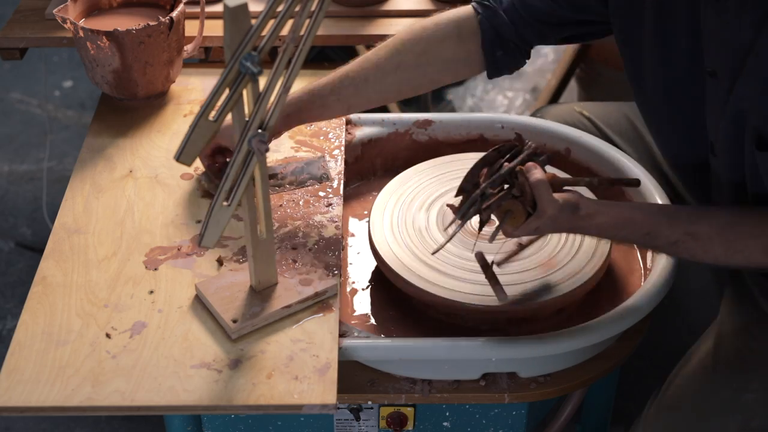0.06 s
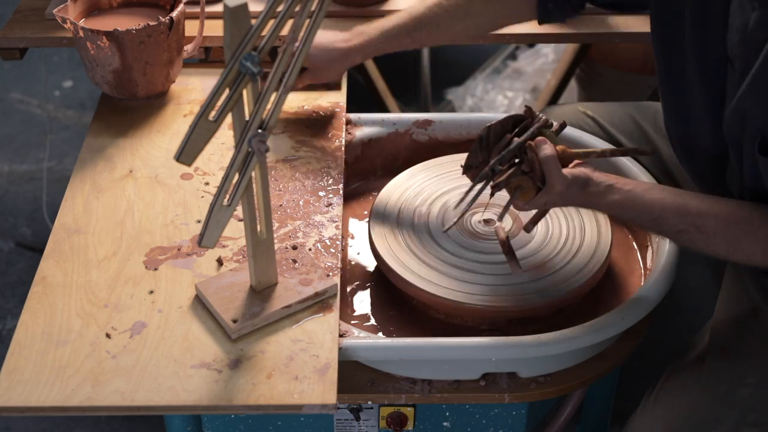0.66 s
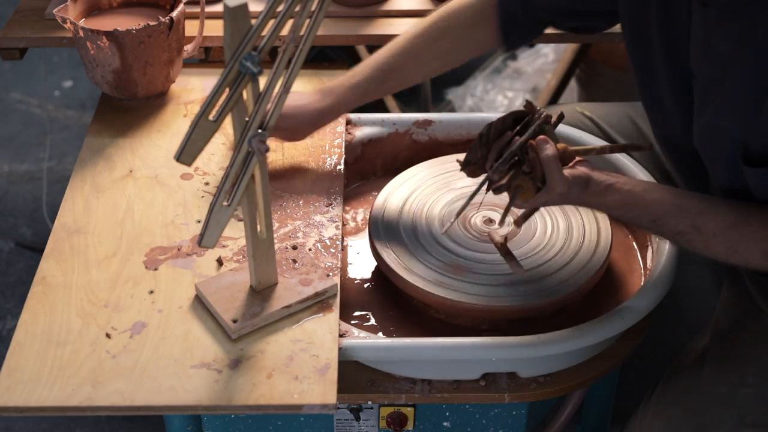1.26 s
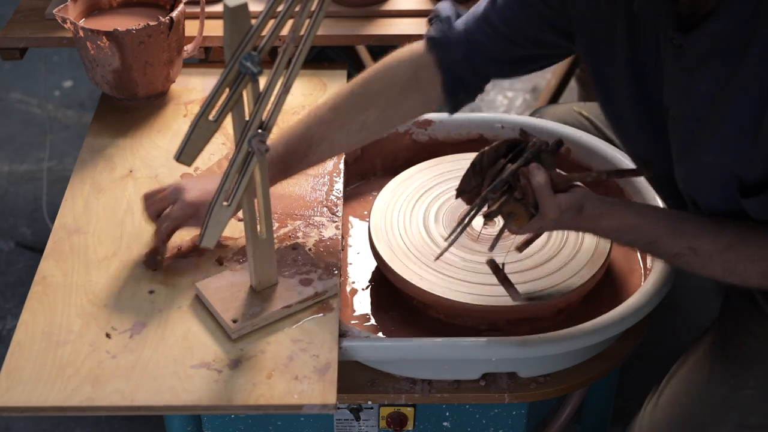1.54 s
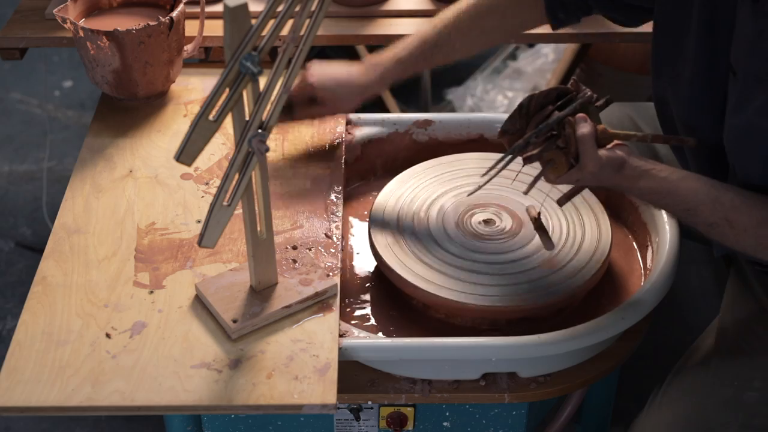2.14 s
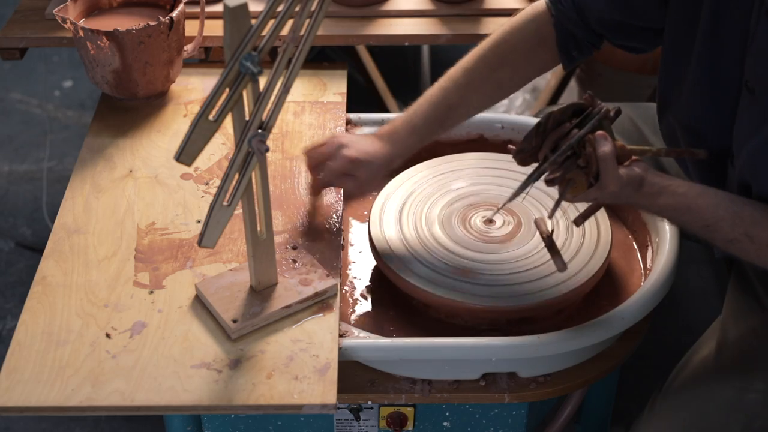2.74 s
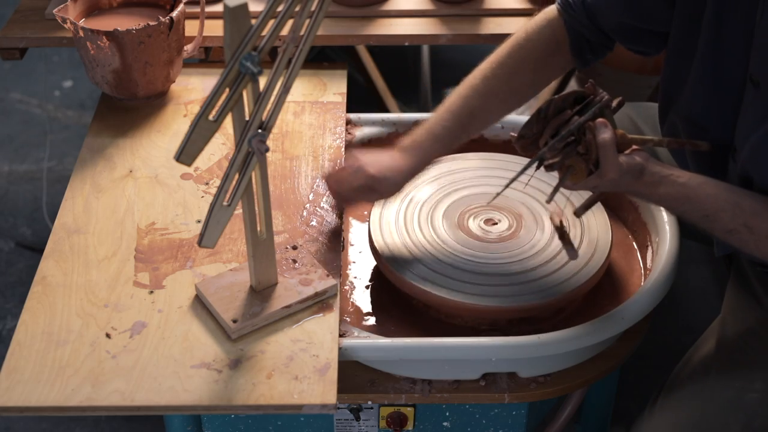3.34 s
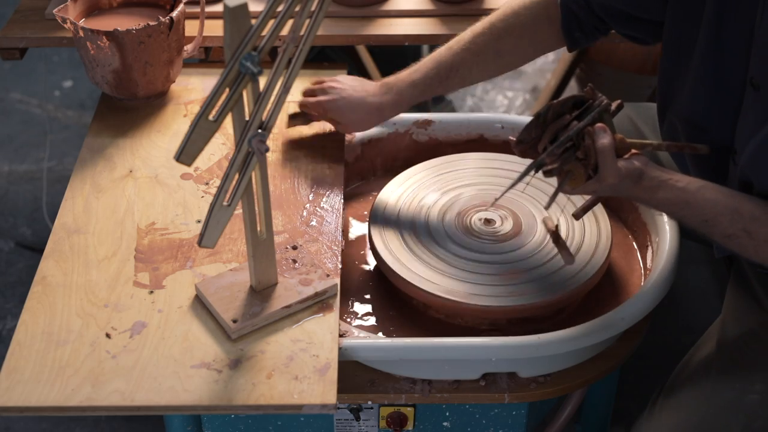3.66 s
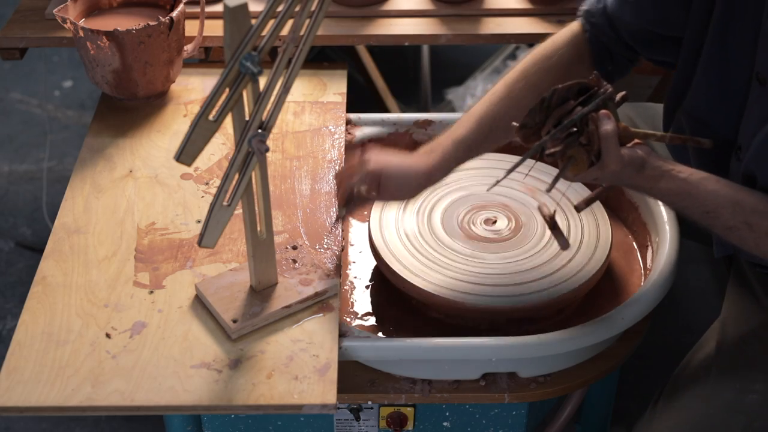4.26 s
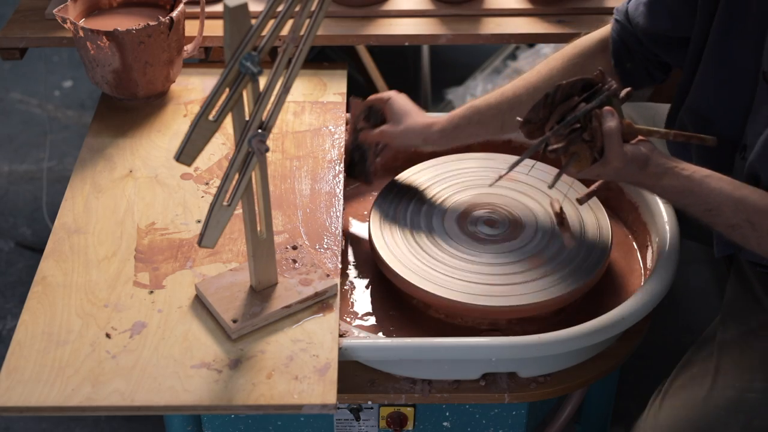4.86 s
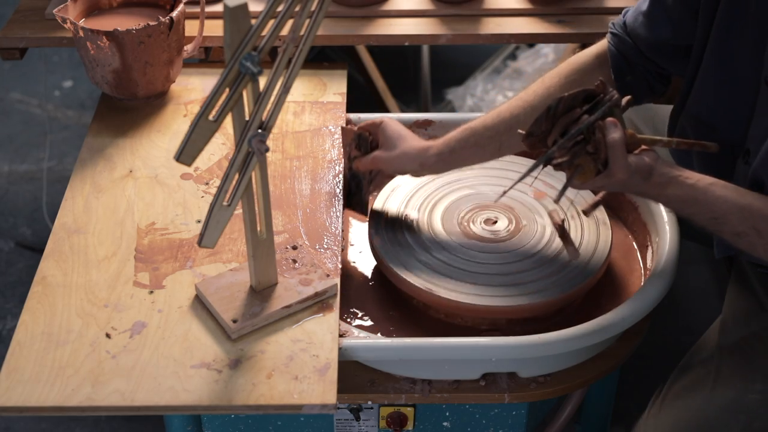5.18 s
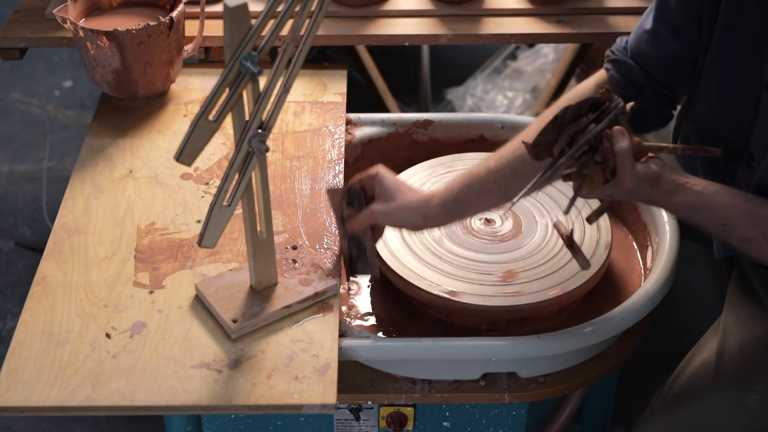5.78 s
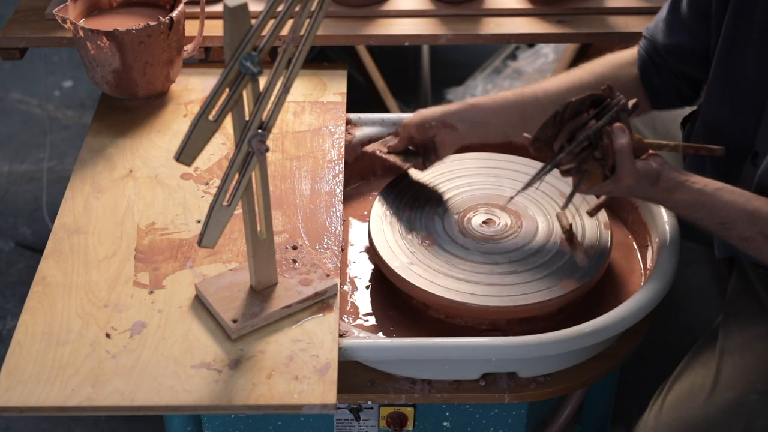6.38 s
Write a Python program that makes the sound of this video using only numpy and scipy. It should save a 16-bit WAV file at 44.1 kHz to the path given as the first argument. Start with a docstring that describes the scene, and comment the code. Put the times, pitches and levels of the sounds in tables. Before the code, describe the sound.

Over the soft rumble of a potter's wheel, faint squelches lead into short, dry-ending rubs of a wet sponge on a wooden board, dotted with sharp wet pops. Louder, hollower wipes and a slow sweep follow at the edge, with more ring to them. Then the sponge is squeezed along the wheel's splash pan in one softer, continuous rub, with light knocks and small bubbles popping.

```python
"""Wet slaps, rubbing and fizz: a sponge wipes clay slip off a wooden board by a potter's wheel.
Trapped air pops as the sponge lands or catches; stick-slip makes the rub, wet pores the fizz.
Early strokes die away quickly; from about 2.7 s on, sounds ring longer. Last, the sponge is
squeezed along the inside of the splash pan and bubbles burst. The wheel rumbles softly throughout."""
import sys
import numpy as np
from scipy import signal
from scipy.fft import rfft, irfft, next_fast_len
from scipy.io import wavfile
from scipy.ndimage import uniform_filter1d, map_coordinates

SR = 44100
rng = np.random.default_rng(int(sys.argv[2]) if len(sys.argv) > 2 else 0)


def put_to_file(sound):
    """Save the sound as 16-bit audio at rate SR, in the file named by the first command-line argument."""
    columns = np.atleast_2d(sound).T  # one column per channel
    safe = np.clip(columns, -1, 1)
    whole_steps = np.round(safe * 32767)
    wavfile.write(sys.argv[1], SR, whole_steps.astype(np.int16))


N = 283122

# Spectra of board rub, pore fizz and low drag. Each row: frequency in Hz, level in dB.
BOARD_RUB_SPECTRUM = [(100, -63), (500, -43), (800, -12), (1000, 1.5), (1400, -1.5), (1750, 0),
                      (2300, -1.5), (2900, -6.5), (3300, -12.5), (4200, -17.5), (5200, -25.5), (8000, -46)]
FIZZ_SPECTRUM = [(2000, -13.5), (4000, 4), (5500, -4.5), (6600, 2.5), (8400, -2), (10000, -2),
                 (12000, -9.5), (14000, -18.5), (15800, -45)]
DRAG_SPECTRUM = [(30, -61), (70, -23.5), (130, -17), (240, -7), (310, -9.5), (400, -2), (650, -1.5),
                 (800, -5.5), (1200, -20.5), (3000, -66)]
# Splash pan resonances. Each row: frequency in Hz, width in Hz, boost in dB.
PAN_RESONANCES = [(375, 19, 3.7), (473, 14, 2.5), (678, 9.3, 2.6), (986, 27, 3.8), (1200, 7.9, 3.6),
                  (1517, 18, 1.7), (1781, 37, 8), (2170, 14, 3.2), (2230, 24, 7.3), (2540, 14, 2),
                  (4460, 170, 2.6), (6600, 200, 1.7), (10300, 1500, 2.7)]


def board_wipes():
    """The sponge rubs the flat board and excites its resonances."""
    # Each row: start in s, length in s, rub, fizz and drag in dB, end push of rub and fizz in dB.
    strokes = [(0.582, 0.073, -57.5, -77, -67.5, 0.5, 3), (0.755, 0.1, -46, -59.5, -62, 10, 11.5),
               (1.05, 0.21, -42.5, -53.5, -57.5, 5, 2.5), (1.352, 0.12, -43.5, -49, -57.5, 7, -0.5),
               (1.586, 0.061, -59, -82, -66, -3.5, 0), (1.734, 0.3917, -49.5, -61.5, -59, 8, 1.5),
               (2.266, 0.28, -48, -59.5, -55.5, 2, 5)]
    # Board resonances. Each row: frequency in Hz, width in Hz, boost in dB.
    modes = [(365, 9.3, 10), (503, 23, 5.5), (1240, 110, 1.5), (1820, 110, 2.5), (2230, 100, 1.5)]
    gains = stroke_gains(strokes, rub_attack_s=0.016, fizz_attack_s=0.011, drag_attack_s=0.02,
                         release_db_per_s=500, drag_push=1.0)
    return wipe(gains, BOARD_RUB_SPECTRUM, FIZZ_SPECTRUM, modes, slips_per_s=5000, slip_spread_db=2.0,
                pores_per_s=13000, pore_spread_db=4.5, clump_db=-0.1)


def edge_wipes():
    """Short, hollow-sounding strokes over the board's edge."""
    # Each row: start in s, length in s, rub, fizz and drag in dB, end push of rub and fizz in dB.
    strokes = [(2.667, 0.011, -57.5, -75, -61.5, -0.5, 3), (2.706, 0.023, -48, -53, -58, 3.5, -0.5),
               (2.893, 0.11, -37.5, -45, -48, 6.5, -2.5), (3.201, 0.086, -39.5, -47, -46, 6.5, -3.5)]
    # Each row: frequency in Hz, level in dB.
    rub_spectrum = [(100, -64), (600, -11.5), (830, -9), (1080, 1.5), (1450, -4), (1900, -4), (2650, -3),
                    (3200, -14), (4300, -21), (8000, -40.5)]
    gains = stroke_gains(strokes, rub_attack_s=0.0094, fizz_attack_s=0.017, drag_attack_s=0.0027,
                         release_db_per_s=412)
    return wipe(gains, rub_spectrum, FIZZ_SPECTRUM, PAN_RESONANCES, slips_per_s=6000,
                slip_spread_db=3.0, pores_per_s=16000, pore_spread_db=4.5, clump_db=1.0)


def edge_sweep():
    """One slow, hollow-sounding sweep along the edge."""
    # One row: start in s, length in s, rub, fizz and drag in dB, end push of rub and fizz in dB.
    stroke = [(3.803, 0.37, -35, -45, -50.5, -2.6, -1.8)]
    # Each row: frequency in Hz, level in dB.
    rub_spectrum = [(200, -63), (830, -20.5), (1000, 0), (1500, -3), (2300, 0), (2750, -6.5), (3200, -9),
                    (4300, -23.5), (5300, -31), (8000, -38)]
    gains = stroke_gains(stroke, rub_attack_s=0.077, fizz_attack_s=0.084, drag_attack_s=0.14,
                         release_db_per_s=173)
    return wipe(gains, rub_spectrum, FIZZ_SPECTRUM, PAN_RESONANCES, slips_per_s=6000,
                slip_spread_db=4.0, pores_per_s=16000, pore_spread_db=0.0, clump_db=-1.1)


def pan_wipe():
    """The sponge slides inside the pan in one unbroken contact."""
    # Each row: time in s, rub in dB, fizz in dB.
    levels = [(4.96, -56.5, -68.5), (5.006, -53, -61), (5.012, -49.5, -56), (5.05, -55.5, -62),
              (5.232, -49, -61), (5.352, -60, -68.5), (5.646, -56, -65.5), (5.67, -51, -59.5),
              (5.77, -55.5, -67), (5.78, -53, -59), (5.904, -56, -62), (5.97, -51, -68)]
    # Each row of both: frequency in Hz, level in dB.
    rub_spectrum = [(200, -60), (620, -11), (830, -9.5), (1000, 2), (1450, -4.5), (2000, -6.5),
                    (2300, -3.5), (2900, -6.5), (3500, -15), (4500, -22), (5200, -31), (8000, -41)]
    fizz_spectrum = [(2000, -20), (4000, 1.5), (5400, -5.5), (6500, 1), (8000, 1), (10300, 2), (12000, -4),
                     (14000, -16), (15800, -25)]
    t = np.arange(N) / SR
    times_s, rub_db, fizz_db = np.transpose(levels)
    held = touch(start_s=4.943, length_s=0.97, attack_s=0.0026, release_db_per_s=300)
    rub = held * amp(np.interp(t, times_s, rub_db))
    fizz = held * amp(np.interp(t, times_s, fizz_db))
    gains = amp(-1.6) * rub, amp(-1.5) * fizz, amp(-9) * rub  # drag follows rub
    return wipe(gains, rub_spectrum, fizz_spectrum, PAN_RESONANCES, slips_per_s=2500,
                slip_spread_db=4.0, pores_per_s=1400, pore_spread_db=0.5, clump_db=1.5)


def wipe(gains, rub_spectrum, fizz_spectrum, modes, slips_per_s, slip_spread_db,
         pores_per_s, pore_spread_db, clump_db):
    """Stick-slip shakes the surface while wet pores crackle in clumps."""
    judder = amp(0.71 * wobble(110))  # grip catches and lets go
    rub_slips = grains(slips_per_s, slip_spread_db) * judder
    rub = travel(colour(rub_slips, rub_spectrum, modes), depth_db=2)
    drag_slips = grains(slips_per_s, slip_spread_db) * judder
    drag = travel(colour(drag_slips, DRAG_SPECTRUM, modes), depth_db=3.5)
    crackle = grains(pores_per_s, pore_spread_db) * judder * amp(clump_db * wobble(70))
    fizz = travel(colour(crackle, fizz_spectrum, modes), depth_db=1.35)
    rub_gain, fizz_gain, drag_gain = gains
    return amp(0.16) * (rub_gain * rub + fizz_gain * fizz + drag_gain * drag)


def stroke_gains(strokes, rub_attack_s, fizz_attack_s, drag_attack_s, release_db_per_s, drag_push=0):
    """Rub, fizz and drag gains: each stroke grips, slides, then pushes or eases as the hand turns."""
    turn_s, lag_s = 0.035, 0.0058  # pores fizz only once compressed
    t = np.arange(N) / SR
    rub, fizz, drag = np.zeros((3, N))
    for start_s, length_s, rub_db, fizz_db, drag_db, push_db, fizz_push_db in strokes:
        turn = np.exp(-(np.minimum(t - start_s - length_s, 0) / turn_s) ** 2)
        rub_touch = touch(start_s, length_s, rub_attack_s, release_db_per_s)
        fizz_touch = touch(start_s + lag_s, length_s - lag_s, fizz_attack_s, 1.23 * release_db_per_s)
        drag_touch = touch(start_s, length_s, drag_attack_s, release_db_per_s)
        rub += amp(rub_db + push_db * turn) * rub_touch
        fizz += amp(fizz_db + fizz_push_db * turn) * fizz_touch
        drag += amp(drag_db + drag_push * push_db * turn) * drag_touch
    return rub, fizz, drag


def touch(start_s, length_s, attack_s, release_db_per_s):
    """Gain of one soft contact: grip, hold, release."""
    t = np.arange(N) / SR - start_s
    grip = (1 - np.exp(-np.maximum(t / attack_s + 0.5, 0))) ** 2
    return grip * amp(-release_db_per_s * np.maximum(t - length_s, 0))


def slaps():
    """Wet slaps as the sponge lands or catches: trapped air pops, the slip splatters."""
    # Each row: time in s, level in dB, pitch in Hz, splatter in dB re level, splatter rise in s.
    hits = [(0.7429, -28.5, 1690, -10, 0.03), (0.7495, -33.5, 1490, -10, 0.033),
            (1.042, -22, 2560, -17.5, 0.041), (1.337, -37, 1600, -0.5, 0.026),
            (1.607, -39, 1710, -3.5, 0.052), (1.714, -29.5, 2420, -7.5, 0.022),
            (2.246, -43, 1490, -4, 0.007), (2.2617, -30.5, 1480, -11.5, 0.05),
            (2.8872, -28.5, 1990, -5.5, 0.0045), (2.9989, -21, 1310, -22, 0.03),
            (3.202, -31, 1930, -5, 0.016), (3.281, -23, 1290, -19, 0.03), (3.7664, -40.5, 2070, -3, 0.0091)]
    pop_peak_s, splatter_t60_s = 0.00043, 0.058
    pops, splatter = np.zeros((2, N))
    for at_s, db, hz, splatter_db, rise_s in hits:
        near = np.arange(round((at_s - 0.03) * SR), round((at_s + 0.12) * SR))
        t = near / SR - at_s
        swell = np.maximum(t, 0) / pop_peak_s
        flow = (swell * np.exp(1 - swell)) ** 3 * np.sin(2 * np.pi * hz * t)
        pops[near] += amp(db) * np.gradient(flow, t) / (2 * np.pi * hz)  # pressure ~ d(flow)/dt
        envelope_db = np.where(t < 0, -6 + 60 * t / rise_s, -60 * t / splatter_t60_s)
        splatter[near] += amp(db + splatter_db + envelope_db)
    drops = grains(6000, spread_db=1.0)
    spray = unit(colour(drops, BOARD_RUB_SPECTRUM))
    spray += amp(-26) * unit(colour(drops, FIZZ_SPECTRUM))
    spray += amp(-13) * unit(colour(drops, DRAG_SPECTRUM))
    return pops + splatter * spray


def squelches():
    """Water seeps through the squeezed sponge; single bubbles burst."""
    # Each row: start in s, length in s, level in dB.
    squeezes = [(0.074, 0.034, -70.5), (0.133, 0.026, -66.5), (0.297, 0.006, -60.5), (0.344, 0.043, -67.5),
                (0.415, 0.029, -64), (0.551, 0.067, -66), (1.036, 0.016, -60), (1.631, 0.012, -63.5),
                (4.476, 0.061, -56)]
    # Each row: time in s, level in dB.
    bubbles = [(0.095, -56), (0.435, -59), (0.655, -47.5), (0.7677, -53), (4.479, -46.5), (5.164, -41),
               (5.226, -40), (5.466, -45), (5.565, -46), (5.785, -44), (5.897, -40), (6.1512, -55.5)]
    # Each row: frequency in Hz, level in dB.
    wet_spectrum = [(400, 0.5), (1500, 2.5), (2500, 6), (3500, -2.5), (5200, -5.5), (6700, 0.5),
                    (8500, -5.5), (10500, -1), (13000, -20), (15800, -17)]
    burst_t60_s = 0.071
    t, bursts = np.arange(SR // 10) / SR, np.zeros(N + SR)
    for at_s, db in bubbles:
        bursts[round(at_s * SR):][:len(t)] += amp(db - 9.5 - 60 * t / burst_t60_s)
    pressed = sum(amp(db) * touch(start_s, length_s, attack_s=0.0065, release_db_per_s=604)
                  for start_s, length_s, db in squeezes)
    seep = travel(colour(grains(4500, spread_db=2.0), wet_spectrum), depth_db=2)
    burst_noise = travel(colour(rng.standard_normal(N), wet_spectrum), depth_db=3.5)
    return pressed * seep + bursts[:N] * burst_noise


def knocks_and_squeak():
    """Light knocks, ticks and a short high squeak, each a narrow cluster of tones."""
    # Each row: time in s, level in dB, pitch in Hz, T60 in s.
    events = [(0.107, -61, 2430, 0.11), (0.146, -56, 485, 0.079), (1.378, -37, 6400, 0.028),
              (2.075, -45.5, 140, 0.13), (3.603, -51.5, 585, 0.12), (4.993, -38, 603, 0.044),
              (5.0135, -37.5, 620, 0.061), (5.0145, -37.5, 1170, 0.028), (5.668, -45, 1260, 0.14),
              (6.371, -66.5, 3680, 0.082)]
    t, out = np.arange(SR // 4) / SR, np.zeros(N + SR)
    for at_s, db, hz, t60_s in events:
        cluster_hz = hz * np.exp(0.1156 * rng.standard_normal((12, 1)))
        cycles = cluster_hz * t + rng.random(cluster_hz.shape)
        tone = unit(np.sin(2 * np.pi * cycles).sum(axis=0))
        attack = 1 - np.exp(-t * hz / 2)
        out[round(at_s * SR):][:len(t)] += amp(db - 2 - 60 * t / t60_s) * attack * tone
    return out[:N]


def ring(x, decay):
    """Diffuse tail, drawn afresh every 0.2 s so that no fixed pitches stand out."""
    step, length = SR // 5, SR * 3 // 4
    out = np.zeros(N + SR)
    for start in range(0, N, step):
        piece = x[start:start + step]
        if piece.any():
            hz, t, noise = signal.stft(rng.standard_normal(length), SR, nperseg=256)
            fade = amp(-60 * t / along(decay, hz)[:, None])
            tail = signal.istft(noise * fade, SR, nperseg=256)[1]
            response = signal.fftconvolve(piece, tail / np.linalg.norm(tail))
            out[start:start + len(response)] += response
    return out[:N]


def wheel():
    """The drive rumbles under a faint hiss; the level steps up once, then eases off."""
    # Each row: frequency in Hz, level in dB.
    rumble_spectrum = [(25, -37), (50, -29.5), (80, -5.5), (250, -3.5), (320, -8), (460, -7.5), (620, -9.5),
                       (800, -11.5), (2000, -17), (3500, -26), (5500, -33.5), (11000, -30), (15800, -35.5)]
    # Drive resonances. Each row: frequency in Hz, width in Hz, boost in dB.
    modes = [(79.3, 13, 5), (145.8, 5.5, 9.3), (256, 13.6, 7.2), (482, 6.4, 10.4), (626, 6.1, 17.6)]
    start_db, swell_db, ease_db_per_s = -70, 6.5, 0.76
    swell_s = (2.7, 2.9)
    t = np.arange(N) / SR
    change_db = np.interp(t, swell_s, [0, swell_db]) - ease_db_per_s * np.maximum(t - swell_s[1], 0)
    gain = amp(start_db + change_db + 0.46 * wobble(4.9))
    return gain * unit(colour(rng.standard_normal(N), rumble_spectrum, modes))


def grains(per_s, spread_db):
    """Random impulses of log-normal size."""
    happens = rng.random(N) < per_s / SR
    sign = np.sign(rng.standard_normal(N))
    return happens * sign * amp(spread_db * np.clip(rng.standard_normal(N), -3, 2.5))


def travel(x, depth_db):
    """Bands swell and fade at random as the contact point moves; output rms 1."""
    bands = signal.stft(x, nperseg=1024)[2]
    drift = uniform_filter1d(rng.standard_normal(bands.shape), size=3, axis=0)
    drift = uniform_filter1d(drift, size=5, axis=1)
    return unit(signal.istft(bands * amp(depth_db * unit(drift)), nperseg=1024)[1][:N])


def colour(x, spectrum, modes=()):
    """Minimum-phase filter: smooth spectrum plus resonant peaks."""
    size = next_fast_len(N + SR // 4, True)
    hz = np.fft.rfftfreq(size, 1 / SR)
    peaks_db = sum(db / (1 + (2 * (hz - mode_hz) / width_hz) ** 2) for mode_hz, width_hz, db in modes)
    cepstrum = irfft(np.log(amp(along(spectrum, hz) + peaks_db)), size)
    cepstrum[1:size // 2] *= 2  # fold to causal
    cepstrum[size // 2 + 1:] = 0
    return irfft(rfft(x, size) * np.exp(rfft(cepstrum)), size)[:N]


def wobble(knots_per_s):
    """Smooth random curve."""
    knots = rng.standard_normal(int(N * knots_per_s / SR) + 4)
    return map_coordinates(knots, [np.arange(N) * knots_per_s / SR])


def along(points, hz):
    """Interpolate (Hz, value) points on a log frequency axis."""
    points_hz, values = np.transpose(points)
    return np.interp(np.log(hz + 1), np.log(points_hz + 1), values)


def amp(db):
    """Decibels to gain."""
    return 10 ** (np.asarray(db) / 20)


def unit(x):
    """Scale to rms 1."""
    return x / np.sqrt(np.mean(x ** 2) + 1e-20)


def scene():
    """Early strokes die away quickly; later sounds ring longer."""
    # Each row of both: frequency in Hz, T60 in s.
    short_decay = [(200, 0.21), (2000, 0.11), (10000, 0.049)]
    long_decay = [(200, 0.95), (1000, 0.59), (2500, 0.55), (5000, 0.55), (6600, 0.54), (10000, 0.35),
                  (15000, 0.2)]
    long_tail_from_s = 2.667
    wipes = board_wipes() + edge_wipes() + edge_sweep() + pan_wipe()
    contact = wipes + slaps() + squelches() + knocks_and_squeak()
    late = np.arange(N) / SR > long_tail_from_s
    short_tail = amp(-13.5) * ring(contact * ~late, short_decay)
    long_tail = amp(-6.5) * ring(contact * late, long_decay)
    return contact + short_tail + long_tail + wheel()


def record(dry):
    """Microphone band limit, mono."""
    top_hz = 15800
    size = next_fast_len(N + SR // 4, True)
    passband = np.fft.rfftfreq(size, 1 / SR) < top_hz
    return irfft(rfft(dry, size) * passband, size)[None, :N]


dry = scene()
out = record(dry)
put_to_file(out)
```